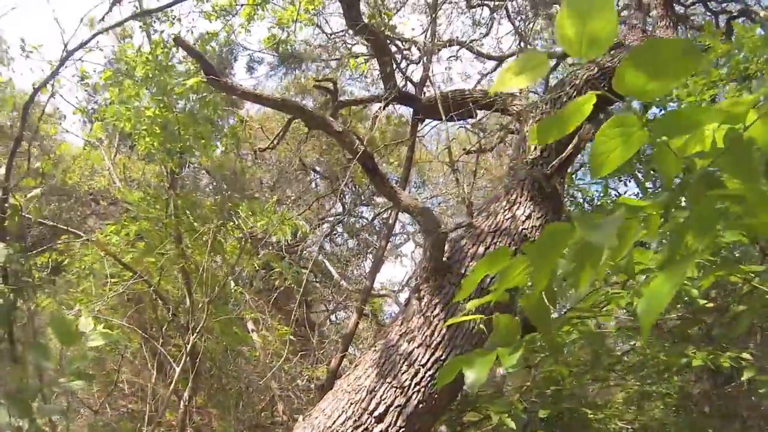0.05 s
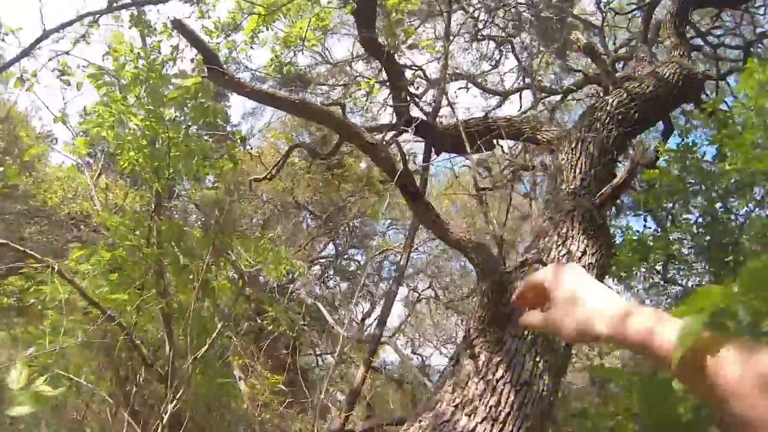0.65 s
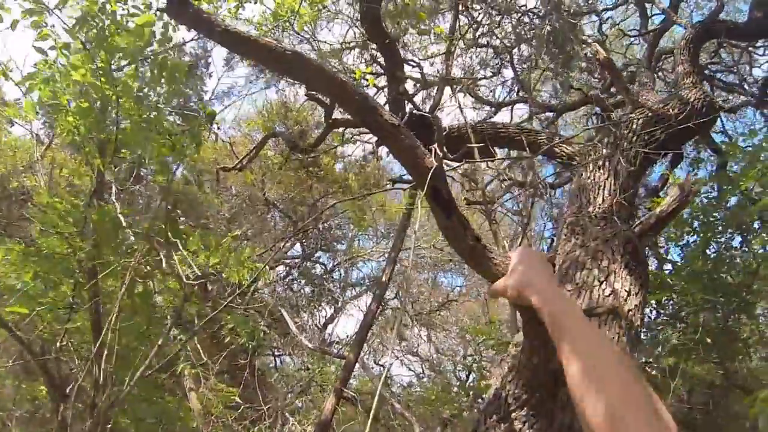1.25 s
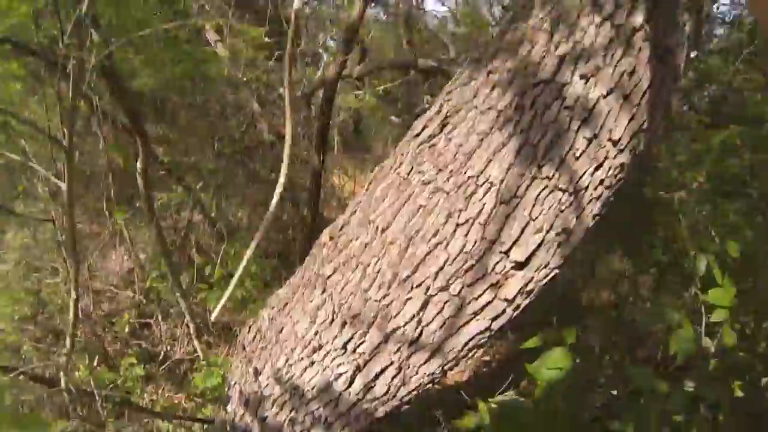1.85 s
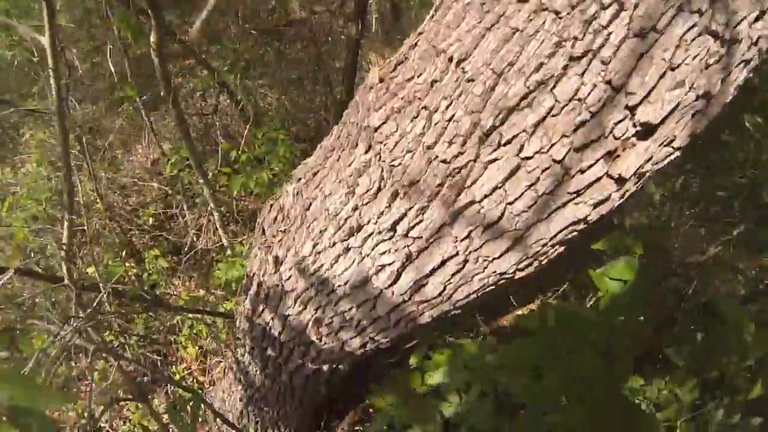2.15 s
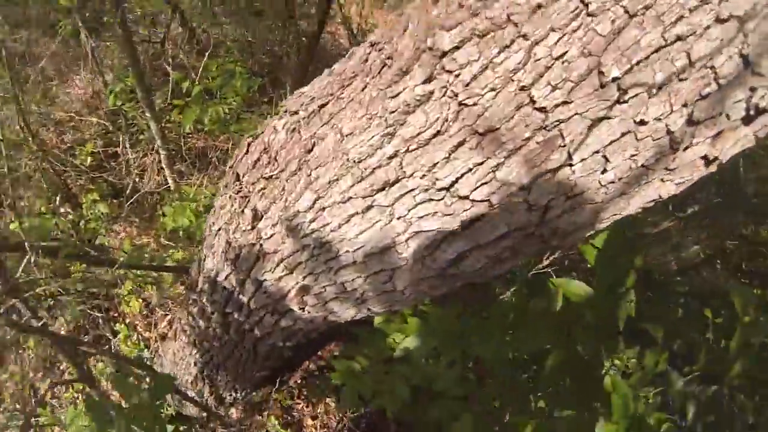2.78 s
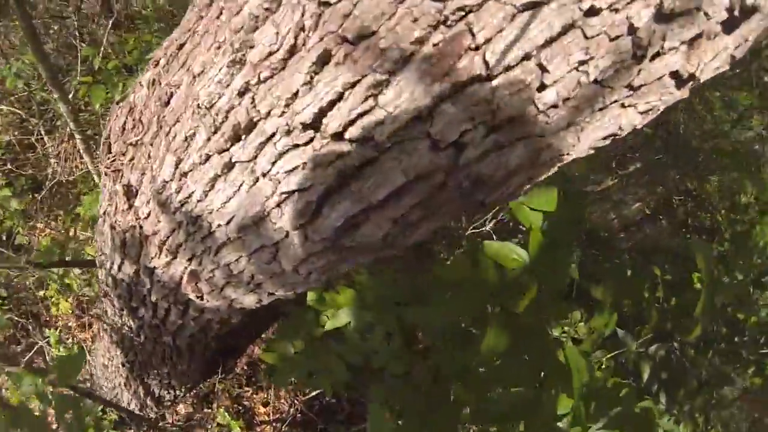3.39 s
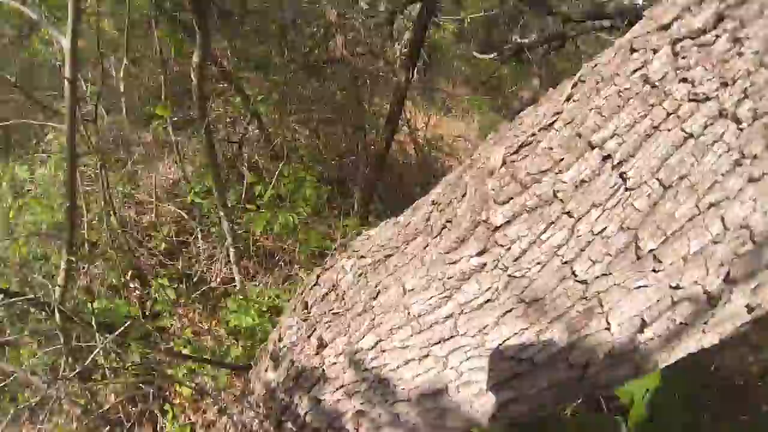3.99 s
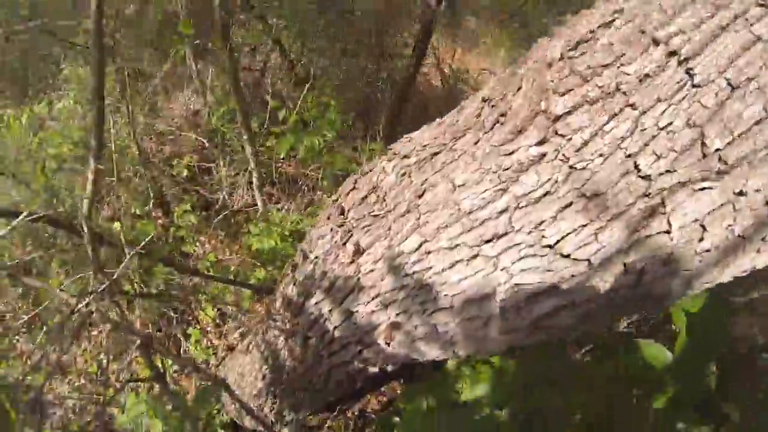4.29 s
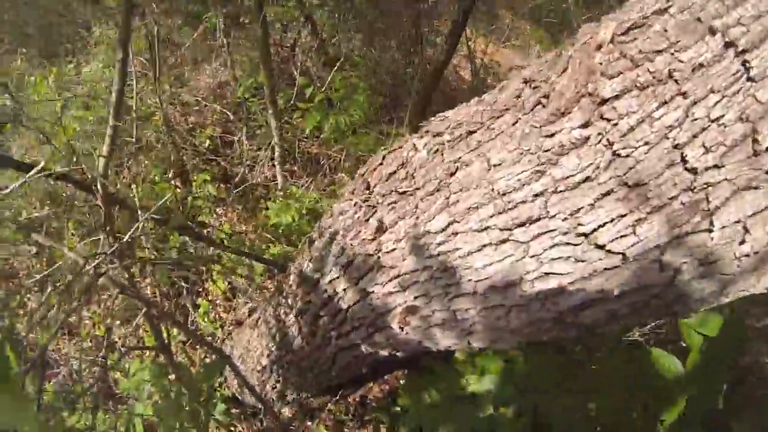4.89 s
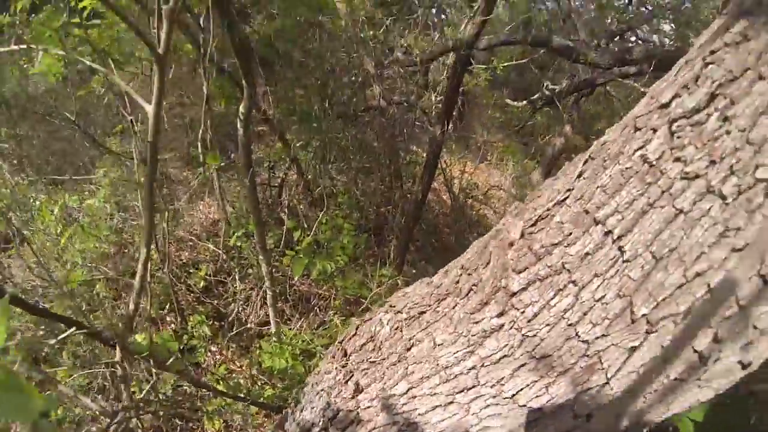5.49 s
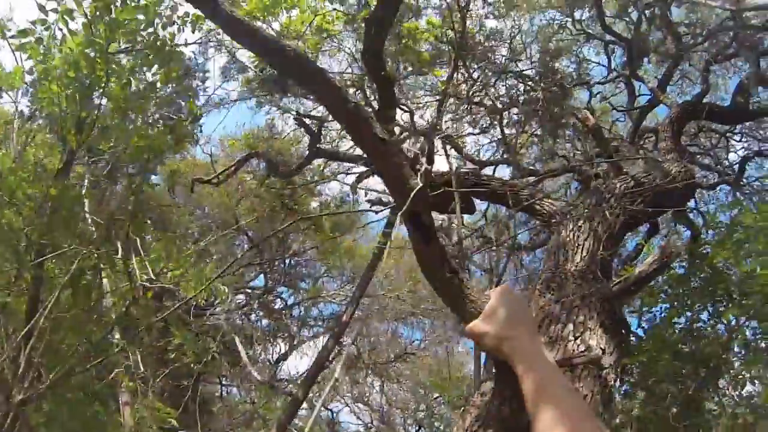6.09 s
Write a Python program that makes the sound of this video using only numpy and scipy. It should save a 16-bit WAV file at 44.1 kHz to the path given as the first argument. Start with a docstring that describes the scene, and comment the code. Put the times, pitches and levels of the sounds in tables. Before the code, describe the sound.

A low, uneven rumble of body movement and a faint outdoor hiss run throughout, heard from a microphone inside a plastic case worn by someone climbing a tree. Leaves brush past very faintly in the first second. Around 1.6 to 1.9 seconds come soft, muffled scuffs on bark, a light bump and one faint twig tick. At 2.3 seconds the case slips in its mount with a sharp, ringing snap and a tiny scrape, followed by a quick run of clicks at 2.7 to 2.8. The busiest stretch, from 3.8 to 4.2 seconds, mixes loud snaps with dull bumps against the trunk, scuffs and a short cloth drag. Single clicks follow at 4.4 and 5.1 seconds, then a loud double snap near 5.3. Faint leaves, bark scuffs and one soft bump come between 5.4 and 6 seconds over the continuing rumble.

```python
"""In an oak, someone climbs with a camera in a plastic case worn on the body.
Each pull makes the case slip in its mount: stick-slip friction excites its modes with a snap, then a
short scrape. It also takes soft bumps and drags against the trunk. Hands and shoes scuff the bark,
muffled by the case, leaves brush past and a twig ticks faintly once, over a low rumble of body
movement and a faint hiss."""
import sys
import numpy as np
from scipy import signal
from scipy.fft import rfft, irfft, next_fast_len
from scipy.io import wavfile
from scipy.ndimage import uniform_filter1d

SR = 44100
rng = np.random.default_rng(int(sys.argv[2]) if len(sys.argv) > 2 else 0)


def to_wav(s):
    """Save 16-bit WAV."""
    ch = np.atleast_2d(s).T  # columns
    pcm = np.round(np.clip(ch, -1, 1) * 32767)  # PCM
    wavfile.write(sys.argv[1], SR, pcm.astype(np.int16))


N = 271078
TOP_HZ = 16100  # the camera's band limit

# strokes of hands, shoes and clothes: (start [s], length [s], bark level [dB], cloth level [dB])
STROKES = [(1.598, 0.013, -47.5, -41), (1.625, 0.048, -63.5, -74), (1.735, .06, -62, -63),
           (1.94, 0.077, -67.5, -78), (2.91, 0.017, -64, -92), (3.1, 0.32, -73.5, -85),
           (3.71, 0.21, -62.5, -52), (3.864, 0.031, -49, -25.5), (3.93, 0.16, -56, -39.5),
           (4.092, .012, -47, -34.5), (5.63, .21, -60.5, -64), (5.745, 0.033, -53.5, -59),
           (5.91, 0.067, -71, -69.5)]
# snaps and short scrapes of the case, and one faint high twig tick at 1.867 s:
# (time [s], snap level [dB], scrape length [s], scrape level [dB], main ring [Hz], second ring [Hz],
# ring boost [dB], knock [dB], bite [dB], edge [dB])
SNAPS = [(1.580, -58, .026, -53, 2230, 3200, -2, -8, -0.5, -18),
         (1.867, -60, .003, -73, 4840, 5070, 10, -8, -4, 10),
         (2.3415, -13.5, 0.037, -31.5, 1557, 4950, 16.5, 3, 1, 5.5),
         (2.712, -22, .012, -30.5, 2200, 2630, 19.5, -9, -1, -10),
         (2.7317, -29, .004, -33, 2190, 2910, 11, -19, 0, -11),
         (2.7385, -15.5, .004, -31, 1420, 2890, 10.5, -11.5, 1, -8),
         (2.7525, -18.5, .022, -25.5, 1210, 5060, 13, -4.5, 6, -0.5),
         (2.7837, -31, 0.015, -32, 1320, 2540, 7, -22, 6, 0),
         (2.8084, -21, .017, -32.5, 1288, 2220, 16, -25, 1, -3.5),
         (3.219, -47, 0.0033, -51, 1770, 1970, -2, 7, -23, -24),
         (3.737, -48.5, 0.0046, -52, 1440, 1710, -1, 7, -9.5, -20),
         (3.77, -46, .004, -56.5, 1760, 2230, 2.5, 2, -13.5, -11.5),
         (3.8003, -11.5, .013, -20.5, 1608, 2190, 8, -3, 1, 8),
         (3.8404, -38, .005, -42.5, 1680, 2110, 9, 2.5, 6, -4),
         (3.8557, -14.5, .004, -33, 2110, 1460, 13.5, 7.5, 0, 4),
         (3.962, -60, 0.026, -45, 1280, 1500, 0, -4, -34, -15),
         (4.024, -50, .012, -51, 3370, 1390, 15, -4, -3, 0),
         (4.096, -43, .003, -52, 1400, 1700, -3, -3, 13, 18),
         (4.1068, -37, 0.028, -41, 1290, 3180, 5, 15, 3, 12),
         (4.1338, -17.5, .011, -30, 1370, 655, 9, 3.5, 8.5, 10.5),
         (4.1564, -31, .015, -26.5, 1970, 3100, 10, -6, 5, 2.5),
         (4.191, -44.5, .004, -49, 1300, 2870, 5, 16, 8.5, 9),
         (4.4342, -21, .011, -27, 1836, 2340, 14, -1.5, 0.5, -1.5),
         (5.0736, -22.5, .012, -36.5, 1312, 3590, 16, 3.5, -2, 2.5),
         (5.2562, -16, .003, -33.5, 2314, 1960, 13.5, -2.5, 10, -12),
         (5.2684, -10, 0.011, -25, 1803, 2765, 11.5, 2, 10, 2),
         (5.2838, -26.5, 0.0023, -26, 1410, 2770, 3.5, 2, 4.5, 2.5)]


def amp(db):
    """Decibels to amplitude ratio."""
    return 10 ** (np.asarray(db) / 20)


def unit(x):
    """Normalisation to rms 1."""
    return x / np.sqrt(np.mean(x ** 2) + 1e-20)


def lasting(x, length):
    """Normalisation to the energy of rms 1 held for length seconds."""
    return x * np.sqrt(length * SR / np.sum(x ** 2))


def along(points, hz):
    """Interpolation of (frequency [Hz], value) points on a logarithmic axis."""
    frequencies, values = np.transpose(points)
    return np.interp(np.log(hz + 1), np.log(frequencies + 1), values)


def add(track, start, x):
    """Superposition of x on the track from start seconds."""
    part = track[round(start * SR):][:len(x)]
    part += x[:len(part)]


def filtered(x, response):
    """Linear filtering: the spectrum of x times a complex frequency response."""
    size = next_fast_len(len(x) + SR // 10)
    return irfft(rfft(x, size) * response(np.fft.rfftfreq(size, 1 / SR)), size)[:len(x)]


def coloured(x, spectrum):
    """Spectral shaping of x, at rms 1."""
    return unit(filtered(x, lambda hz: amp(along(spectrum, hz))))


def causal(x, gain, size=8192):
    """Minimum-phase filtering: folding the cepstrum gives a causal response with this gain."""
    cepstrum = irfft(np.log(gain(np.fft.rfftfreq(size, 1 / SR)) + 1e-6))
    cepstrum[1:size // 2] *= 2
    cepstrum[size // 2 + 1:] = 0
    impulse_response = irfft(np.exp(rfft(cepstrum)))[:size // 4]
    return signal.fftconvolve(x, impulse_response)[:len(x)]


def resonance(hz, centre, width):
    """Frequency response of one damped oscillator."""
    return 1j * hz * width / (centre ** 2 - hz ** 2 + 1j * hz * width)


def dispersed(x, transit_s=.0004):
    """Dispersion: bending waves speed up with the root of frequency, so the treble arrives first."""
    return filtered(x, lambda hz: np.exp(-2j * np.pi * transit_s * (2 * np.sqrt(hz * TOP_HZ) - hz)))


def grains(size, rate, spread_db):
    """Friction as a Poisson process: tiny slips of random strength, on average rate per second."""
    occurs = rng.random(size) < rate / SR
    return occurs * rng.standard_normal(size) * amp(spread_db * rng.standard_normal(size))


def stroke(start, length, rise=0.18, fall=0.19):
    """Exponential swell, hold and decay; the time constants are shares of the length."""
    t = np.arange(N) / SR - start
    return np.exp(np.minimum(t, 0) / (rise * length) - np.maximum(t - length, 0) / (fall * length))


def case(force, rings, knock_db, bite_db, edge_db, ring_width_hz=150):
    """Modal response of the case: the contact point favours rings of (frequency [Hz], boost [dB])."""
    # modes of the plastic shell: (frequency [Hz], width [Hz], gain [dB])
    modes = [(416, 2800, -15.5), (672.7, 170, -9.5), (1298, 262, 1.5), (1640, 420, 1), (1970, 380, -2),
             (2350, 480, -4.5), (3028, 390, -4.5), (3330, 58, -3.5), (3703, 570, -10), (5048, 1300, -13.5),
             (5880, 310, -18), (6390, 340, -15), (7077, 1900, -27), (10620, 1000, -35.5),
             (13500, 2500, -46.5)]
    tilt = [(850, knock_db), (1150, 0.014), (2000, 0.0033), (2700, bite_db), (4000, bite_db),
            (4700, edge_db)]

    def gain(hz):
        power = sum((amp(db) * np.abs(resonance(hz, centre, width)) ** 2) ** 2
                    for centre, width, db in modes)
        boost_db = sum(db * np.abs(resonance(hz, centre, ring_width_hz)) ** 2 for centre, db in rings)
        return np.sqrt(power) * amp(along(tilt, hz) + boost_db)
    return causal(force, gain)


def background(air_db=-61):
    """Stationary noise: broadband from still woodland air, narrowband from the camera's electronics."""
    # spectrum of the air: (frequency [Hz], relative level [dB])
    spectrum = [(59, -22.5), (100, 2), (244, -8), (328, -9.5), (481, -11.5), (524, -13.5), (891, -18.5),
                (1550, -22), (3700, -23), (4380, -29.5), (5080, -28), (9410, -34.5), (10200, -33),
                (15000, -51.5), (16000, -58.5)]
    # electronic hiss, each band two like resonances in series: (centre [Hz], width [Hz], level [dB])
    bands = [(4970, 350, -85.5), (10080, 130, -84)]
    out = amp(air_db) * coloured(rng.standard_normal(N), spectrum)
    for centre, width, db in bands:
        hiss = filtered(rng.standard_normal(N), lambda hz: resonance(hz, centre, width) ** 2)
        out += amp(db) * unit(hiss)
    return out


def rumble(evenness=0.19, gain_db=1):
    """Structure-borne sound: the climber's body shakes the camera without pause."""
    # spectrum of the shaking: (frequency [Hz], relative level [dB])
    spectrum = [(12, -17), (22, 1.5), (36, -1), (48, -4.5), (60, -15), (75, -29), (100, -40.5),
                (160, -71.5), (300, -120)]
    # strength of body movement: (time [s], relative level [dB])
    movement = [(0, -30.9), (0.25, -36.7), (0.75, -27.2), (1.05, -26.5), (1.4, -34.1), (1.65, -24.9),
                (2.1, -34.7), (2.7, -38.6), (3.15, -38.9), (3.32, -31.0), (3.75, -31.3), (4.0, -24.2),
                (4.27, -34.2), (4.65, -29.3), (4.85, -36.8), (5.2, -27.2), (5.7, -26.9), (6.15, -32.6)]
    shake = coloured(rng.standard_normal(N), spectrum)
    power = np.abs(signal.hilbert(shake)) ** 2
    swell = np.sqrt(np.abs(uniform_filter1d(power, SR // 12)))
    steadied = unit(shake / (swell + .01) ** evenness)
    movement_db = np.interp(np.arange(N) / SR, *np.transpose(movement))
    return amp(gain_db + movement_db) * steadied


def bark_scuffs(grip_db=-72.5, grit_db=-8):
    """Friction on rough bark: fine slips and coarser crumbs, faint in a steady grip, loud in strokes."""
    # spectrum of the fine scuffing: (frequency [Hz], relative level [dB])
    spectrum = [(200, -24), (450, -14), (700, -4), (1000, -11.5), (1250, -4), (1400, 0.5), (1650, -3.5),
                (2100, -11), (3400, -21), (4500, -32), (9000, -40.5), (16000, -53.5)]
    fine = coloured(grains(N, rate=2800, spread_db=1), spectrum)
    grit = grains(N, rate=45, spread_db=1)
    crumbs = unit(case(grit, [(1450, 13)], knock_db=0.5, bite_db=-5.5, edge_db=-7.5))
    scuff = sum(amp(db) * stroke(start, length) for start, length, db, _ in STROKES)
    return (amp(grip_db) + scuff) * (fine + amp(grit_db) * crumbs)


def leaves():
    """Shot noise: many tiny contacts with twigs and leaves merge into a swish."""
    # spectrum of the rustle: (frequency [Hz], relative level [dB])
    spectrum = [(800, -19.5), (2000, -1), (3500, -3), (7000, -9), (11000, -15), (16000, -24)]
    # foliage brushing past: (start [s], length [s], level [dB])
    brushes = [(.28, .14, -72), (0.644, 0.14, -71), (1.87, 0.14, -74.5), (2.876, 0.023, -63.5),
               (5.44, 0.25, -74)]
    swish = sum(amp(db) * stroke(start, length) for start, length, db in brushes)
    return swish * coloured(grains(N, rate=1600, spread_db=2.5), spectrum)


def snaps(chatter_t60_s=0.042, usual_snap_db=-20, usual_chatter_db=-29):
    """Impulse excitation: a jolt and brief chatter as the mount lets go or, once, a twig ticks."""
    out, t = np.zeros(N), np.arange(SR // 8) / SR
    for start, db, _, _, main_hz, second_hz, boost_db, *tilt in SNAPS:
        chatter_db = usual_chatter_db - 0.42 * (db - usual_snap_db)  # harder snaps break cleaner
        chatter = unit(grains(len(t), rate=11000, spread_db=2.5))
        force = amp(chatter_db - 60 * t / chatter_t60_s) * chatter
        force[0] = 1  # the jolt
        ring = dispersed(case(force, [(main_hz, boost_db), (second_hz, boost_db)], *tilt))
        add(out, start, amp(db) * lasting(ring, length=0.0044))
    return out


def scrapes(boost_db=7, knock_db=-5, fade_db_per_s=348.5, dulling_db=-7.5):
    """Sliding friction after each snap or tick: dense grains fade as the slide slows, then stop."""
    out, t = np.zeros(N), np.arange(SR // 8) / SR
    for start, _, length, db, ring_hz, *_, bite_db, edge_db in SNAPS:
        force = grains(len(t), rate=5000, spread_db=2.5) * amp(-fade_db_per_s * t) * (t < length)
        force[0] = 1  # the opening impulse
        ring = case(force, [(ring_hz, boost_db)], knock_db, bite_db, edge_db + dulling_db)
        add(out, start, amp(db) * lasting(ring, length))
    return out


def cloth_drag():
    """Sliding friction on a soft surface: the case drags over cloth with a dull noise."""
    # spectrum of the drag: (frequency [Hz], relative level [dB])
    spectrum = [(40, -23.5), (90, 3.5), (150, -6.5), (300, -13), (600, -26.5), (1200, -44), (4000, -99.5)]
    drag = sum(amp(db) * stroke(start, length) for start, length, _, db in STROKES)
    return drag * coloured(rng.standard_normal(N), spectrum)


def bumps(leak_hz=22):
    """A soft impact is one pulse of pressure; its leak out of the case acts as a high-pass filter."""
    # blows on the case: (time [s], peak before the leak [dB], half width [s])
    blows = [(1.601, -39.5, 0.0012), (1.777, -23, 0.0023), (3.86, -0.5, 0.0016), (3.893, -11.5, .002),
             (3.908, -11.5, 0.0022), (4.011, -9, .0026), (4.096, 0, 0.0038), (5.784, -17, 0.0043)]
    t = np.arange(N) / SR
    push = sum(amp(db) / (1 + ((t - time) / width) ** 2) for time, db, width in blows)
    return filtered(push, lambda hz: 1j * hz / (1j * hz + leak_hz))


def scene():
    """Superposition: everything reaches one microphone inside the case."""
    contacts = snaps() + scrapes() + bumps() + bark_scuffs() + leaves() + cloth_drag()
    return (contacts + rumble() + background())[None]


def record(dry):
    """Ideal low-pass filtering: the camera keeps nothing above its band limit."""
    return filtered(dry[0], lambda hz: hz < TOP_HZ)[None]


dry = scene()
out = record(dry)
to_wav(out)
```